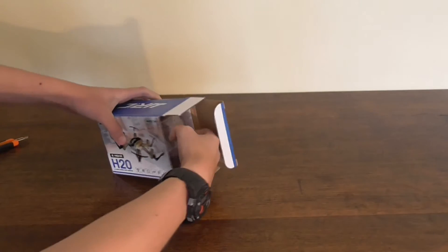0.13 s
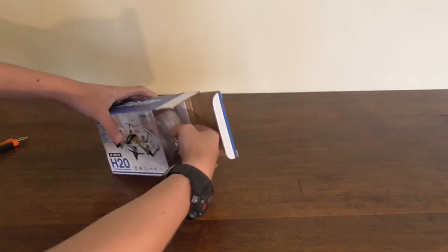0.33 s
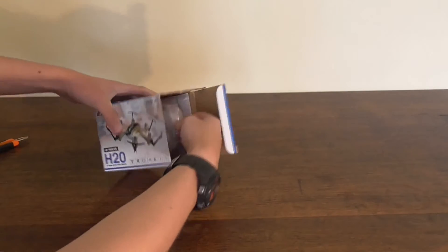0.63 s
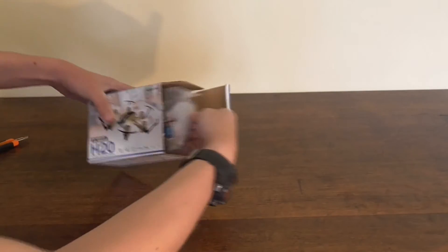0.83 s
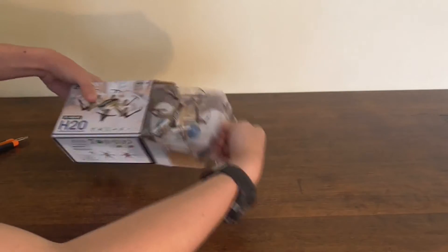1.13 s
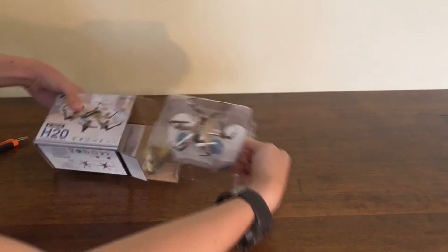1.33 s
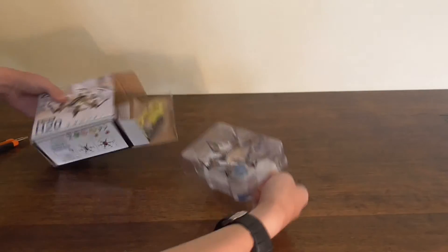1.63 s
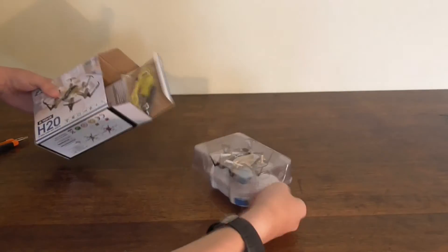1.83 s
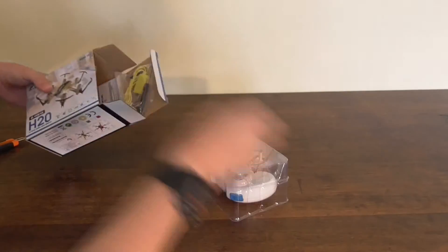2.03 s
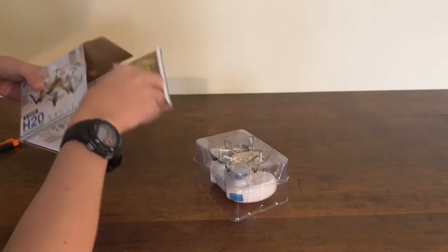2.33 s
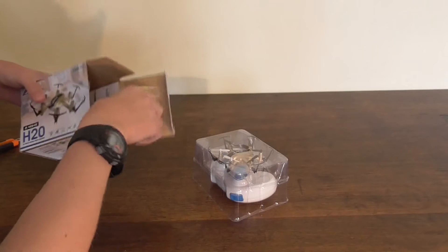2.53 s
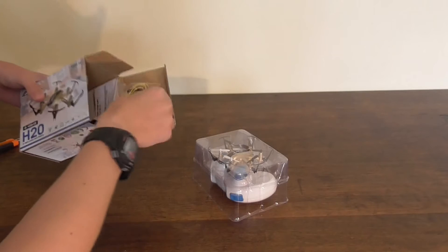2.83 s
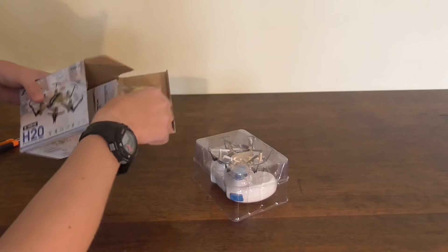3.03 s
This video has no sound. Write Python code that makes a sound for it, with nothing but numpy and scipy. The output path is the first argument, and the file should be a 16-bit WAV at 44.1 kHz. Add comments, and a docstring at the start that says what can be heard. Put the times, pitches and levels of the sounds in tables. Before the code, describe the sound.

A cardboard box being unpacked, with hollow knocks, sharp plastic snaps and rustling.

```python
"""Hollow cardboard knocks and sharp plastic snaps sound in a live room as a thin tray leaves its box.
Struck or buckling panels ring briefly, creases in the plastic flip over with a crack, and stick-slip
friction makes the card drum and the plastic crinkle. The tray lands on a wooden table with a few dull
thuds; then a hand rummages among the paper in the box. A faint steady noise lies underneath."""
import sys
import numpy as np
from scipy import signal
from scipy.fft import rfft, irfft
from scipy.io import wavfile

SR = 44100
rng = np.random.default_rng(int(sys.argv[2]) if len(sys.argv) > 2 else 0)


def wav_record(signal):
    """Record a signal, one row per channel, as 16-bit PCM in the file named by sys.argv[1]."""
    frames = np.transpose(np.atleast_2d(signal))
    bounded = np.clip(frames, -1, 1)
    # unit amplitude maps onto the largest positive 16-bit level
    quanta = np.round(bounded * 32767).astype(np.int16)
    wavfile.write(sys.argv[1], SR, quanta)


N = 141120
T = np.arange(N) / SR
FFT_SIZE = 5 * 2 ** 15
HZ = np.maximum(np.arange(FFT_SIZE // 2 + 1) * SR / FFT_SIZE, 1)


def from_db(db):
    """Amplitude ratio: tenfold for every 20 dB."""
    return 10 ** (np.asarray(db) / 20)


def unit_rms(x):
    """Normalisation to unit mean power."""
    return x / np.sqrt(np.mean(x ** 2) + 1e-20)


def at_hz(points, hz=HZ):
    """Interpolation of a table on a log-frequency axis."""
    frequencies, values = np.transpose(points)
    return np.interp(np.log(hz), np.log(frequencies), values)


def decay(t, t60):
    """Exponential damping: a fall of 60 dB in t60 seconds."""
    return np.exp(-np.log(1000) * t / max(t60, 1e-4))


def resonances(modes, width_hz):
    """Resonance: each mode adds a bell-shaped peak, in dB, to a body's response."""
    return sum(db / (1 + (2 * (HZ - hz) / width_hz) ** 2) for hz, db in modes)


def colour(x, db):
    """Causal, minimum-phase filtering, scaled so that white noise keeps its power."""
    gain = unit_rms(from_db(db))
    cepstrum = irfft(np.log(gain + 1e-9))[:FFT_SIZE // 2]
    cepstrum[0] /= 2
    response = np.exp(rfft(2 * cepstrum, FFT_SIZE))
    return irfft(rfft(x, FFT_SIZE) * response)[..., :x.shape[-1]]


def bands(length, low_hz, count=7):
    """Complementary log-spaced bands: pairs of centre in Hz and bin weights that sum to one."""
    centres = np.geomspace(low_hz, 15000, count)
    log_hz = np.log(np.arange(length // 2 + 1) * SR / length + 1)
    return [(hz, np.interp(log_hz, np.log(centres), share)) for hz, share in zip(centres, np.eye(count))]


def add(track, start, sound):
    """Superposition: a sound joins the track at its start in seconds."""
    i = max(int(start * SR), 0)
    track[i:i + len(sound)] += sound[:N - i]


def contact(t60, size=4096, whitening=0.92):
    """Broadband excitation: a dying flurry of tiny slips with a nearly flat spectrum."""
    fall = decay(T[:size], t60)
    spectrum = rfft(rng.standard_normal(size) * fall)
    flurry = irfft(spectrum / (np.abs(spectrum) + 1e-12) ** whitening) * np.sqrt(fall)
    return .5 * unit_rms(flurry) * np.sqrt(np.mean(fall ** 2))


def judder(per_s, depth_db):
    """Random amplitude modulation: a gain that wavers by depth_db rms."""
    knots = rng.standard_normal(4096)
    wavering = unit_rms(np.interp(T * per_s, np.arange(len(knots)), knots))
    return from_db(depth_db * wavering)


def clicks(per_s, spread_db):
    """Shot noise: independent impulses of uneven size and either sign."""
    sizes = from_db(spread_db * np.minimum(rng.exponential(1, N), 4.5))
    signs = rng.choice([-1, 1], N)
    return unit_rms(sizes * signs * (rng.random(N) < per_s / SR))


# Each row: start in seconds, ring level in dB, panel pitch in Hz, clatter level in dB.
BOX_KNOCKS = [(.008, -26.5, 170, -36), (0.113, -23.5, 416, -50), (.1498, -24, 500, -27),
              (0.2347, -21, 855, -16.5), (0.254, -37, 234, -48), (.2728, -20, 500, -13.5),
              (0.2774, -12.5, 547, -15.5), (0.2962, -20, 547, -16.5), (0.5965, -10, 565, -19),
              (0.7695, -16.5, 427, -18.5), (0.7858, -20.5, 502, -23), (0.8453, -13, 518, -26.5),
              (1.0985, -22.5, 317, -44), (1.129, -24, 1110, -14.5), (1.479, -26.5, 460, -29),
              (1.543, -16.5, 726, -17), (2.32, -34, 471, -40.5), (2.376, -24.5, 736, -30),
              (2.647, -29.5, 862, -27), (2.7686, -22.5, 423, -25), (3.171, -31, 394, -50)]
# The clatter's spectrum. Each row: frequency in Hz, relative gain in dB.
BOX_SPECTRUM = [(50, -27.5), (180, -19.5), (600, 4), (1250, 1), (1900, -11), (4000, -17.5), (8000, -30),
                (16000, -42)]
# Resonances of the box and the air in it. Each row: frequency in Hz, boost in dB.
BOX_MODES = [(179, 3), (306, 4.5), (368, 7.5), (442, 2.5), (580, 4.5), (690, 7)]
BOX_MODE_WIDTH_HZ = 17


def box_knocks(ring_t60_s=0.041, attack_s=0.0015, clatter_t60_s=0.04, low_cut_hz=173):
    """Damped free vibration: a knocked or buckling panel rings while the rest of the box clatters."""
    panels, clatter = np.zeros(N), np.zeros(N)
    t = T[:SR // 4]
    envelope = decay(t, ring_t60_s) * (1 - np.exp(-t / attack_s))
    for start, ring_db, hz, clatter_db in BOX_KNOCKS:
        add(panels, start, from_db(ring_db) * np.sin(2 * np.pi * hz * t) * envelope)
        add(clatter, start, from_db(clatter_db) * contact(clatter_t60_s))
    panels = signal.sosfilt(signal.butter(2, low_cut_hz, "high", fs=SR, output="sos"), panels)
    return panels + colour(clatter, at_hz(BOX_SPECTRUM) + resonances(BOX_MODES, BOX_MODE_WIDTH_HZ))


# Each row: start in seconds, level in dB, 60 dB decay time in seconds.
PLASTIC_SNAPS = [(0.0428, -21, 0.0056), (0.066, -36.5, 0.017), (0.1502, -33, 0.01), (0.2073, -29, 0.013),
                 (0.235, -18, 0.017), (0.296, -30, 0.012), (.315, -25.5, 0.024), (0.4954, -7, 0.011),
                 (1.128, -16, 0.099), (1.135, -18.5, 0.02), (1.16, -17, 0.025), (1.3788, -28, 0.022),
                 (1.4872, -29.5, 0.018), (1.5449, -5.5, 0.0078), (2.376, -31.5, 0.013), (2.551, -31, 0.046),
                 (2.58, -29, 0.0073), (2.648, -31, 0.032), (2.7065, -25, 0.012), (2.802, -25, 0.0092),
                 (3.1951, -35, 0.02)]
# The snaps' spectrum. Each row: frequency in Hz, relative gain in dB.
PLASTIC_SPECTRUM = [(70, -24), (200, -20.5), (750, 2.5), (2900, -1.5), (4500, 2.5), (7000, -1.5),
                    (12000, -2.5), (16500, -24)]
# Resonances of the tray. Each row: frequency in Hz, boost in dB.
TRAY_MODES = [(1134, 4), (2140, 9.5), (2700, -0.5), (4230, 5)]
TRAY_MODE_WIDTH_HZ = 79


def plastic_snaps():
    """Snap-through buckling: a crease flips over and its brief crack excites the tray's modes."""
    cracks = np.zeros(N)
    for start, db, t60 in PLASTIC_SNAPS:
        add(cracks, start, from_db(db) * contact(t60))
    return colour(cracks, at_hz(PLASTIC_SPECTRUM) + resonances(TRAY_MODES, TRAY_MODE_WIDTH_HZ))


# Card, plastic and paper slide on each other.
# Each row: start in seconds, length in seconds, drumming level in dB, crinkle level in dB.
SLIDE_STROKES = [(0, 0.19, -41, -55.5), (0.217, .1, -36, -60), (0.386, 0.023, -34.5, -41.5),
                 (0.433, 0.076, -34, -40.5), (0.589, .06, -35, -39.5), (0.703, 0.059, -42.5, -43),
                 (0.82, 0.15, -35, -39.5), (0.938, 0.2, -46.5, -52.5), (1.085, 0.14, -35, -39.5),
                 (1.198, 0.21, -39.5, -46), (1.36, 0.19, -47.5, -53.5), (1.823, 0.19, -37, -51.5),
                 (2.31, 0.061, -52.5, -56), (2.36, 0.08, -41.5, -51.5), (2.498, 0.099, -43, -42.5),
                 (2.578, 0.083, -45, -46.5), (2.668, 0.21, -50, -51), (2.794, 0.058, -43, -42),
                 (2.907, 0.15, -48.5, -54), (3.079, 0.13, -49.5, -52.5)]
# Spectra of the drumming and the crinkle. Each row: frequency in Hz, relative gain in dB.
DRUMMING_SPECTRUM = [(50, -40), (170, -5.5), (550, 2.5), (1300, -5), (2200, -21.5), (16000, -40.5)]
CRINKLE_SPECTRUM = [(300, -30), (1200, -9), (3000, 2.5), (4500, 4), (7000, 0.5), (12500, 4), (16000, -22)]


def sliding_edges(swell_power=0.7):
    """Stick-slip friction: coarse catches drum on the card, fine ones crinkle in separate bands."""
    drumming_swell, crinkle_swell = np.zeros(N), np.zeros(N)
    for start, length, drumming_db, crinkle_db in SLIDE_STROKES:
        speed = np.abs(np.sin(np.pi * T[:int(length * SR)] / length))
        strength = speed ** swell_power
        add(drumming_swell, start, from_db(drumming_db) * strength)
        add(crinkle_swell, start, from_db(crinkle_db) * strength)
    coarse = clicks(per_s=900, spread_db=0.5)
    drumming = drumming_swell * unit_rms(coarse * judder(per_s=83, depth_db=1.5))
    fine = irfft(sum(band * rfft(clicks(per_s=2500, spread_db=4)) for _, band in bands(N, low_hz=1197)))
    crinkle = crinkle_swell * unit_rms(fine * judder(per_s=110, depth_db=3))
    box_db = at_hz(DRUMMING_SPECTRUM) + resonances(BOX_MODES, BOX_MODE_WIDTH_HZ)
    tray_db = at_hz(CRINKLE_SPECTRUM) + resonances(TRAY_MODES, TRAY_MODE_WIDTH_HZ)
    return colour(drumming, box_db) + colour(crinkle, tray_db)


# Each row: start in seconds, level in dB, 60 dB decay time of the rattle in seconds.
TRAY_LANDINGS = [(1.7106, -28, 0.21), (1.721, -30.5, 0.14), (1.8353, -24, 0.14), (1.9008, -23.5, 0.08),
                 (1.91, -19, 0.06)]
# The thuds on the wooden table. Each row: frequency in Hz, relative gain in dB.
THUD_SPECTRUM = [(40, -32), (170, -5), (450, 0.5), (1450, -7), (2300, -23), (9000, -28), (16000, -38)]


def tray_landings():
    """Impact excitation: the tray meets the table edge by edge and its contents rattle dully."""
    impacts = np.zeros(N)
    for start, db, t60 in TRAY_LANDINGS:
        add(impacts, start, from_db(db) * contact(t60))
    return colour(impacts, at_hz(THUD_SPECTRUM))


# Each row: frequency in Hz, reverberation time in seconds.
ROOM_T60 = [(150, 0.48), (400, 0.35), (3000, 0.53), (15000, 0.53)]
# Each row: frequency in Hz, tail against direct sound in dB before wet_db is added.
TAIL_LEVEL = [(60, 1), (300, -2.5), (2000, -3.5), (14000, -14)]
# Each row: frequency in Hz, the tail's side against its mid in dB.
TAIL_WIDTH = [(300, -10), (12000, 1)]
# Each row: frequency in Hz, left minus right in dB.
STEREO_BALANCE = [(600, -0.7), (6000, -0.4), (13000, -5)]


def room(x, wet_db, delay_s=0.00088, build_s=0.0031):
    """Reverberation: a diffuse stereo tail follows the direct sound and dies away band by band."""
    t = T[:SR // 2]
    noise, tail = rfft(rng.standard_normal((2, len(t)))), 0
    onset = np.clip((t - delay_s) / build_s, 0, 1)
    for hz, band in bands(len(t), low_hz=67):
        fall = onset * decay(t, at_hz(ROOM_T60, hz))
        tail = tail + irfft(noise * band) * fall / np.sqrt(np.sum(fall ** 2))
    mid, side = rfft(tail, FFT_SIZE) * from_db(at_hz(TAIL_LEVEL) + wet_db)
    ears = np.array([[1], [-1]])
    response = 1 + mid + ears * side * from_db(at_hz(TAIL_WIDTH))
    balance = from_db(ears * at_hz(STEREO_BALANCE) / 2)
    return irfft(rfft(x, FFT_SIZE) * response * balance)[:, :N]


# The room's steady noise. Each row: frequency in Hz, relative gain in dB.
AMBIENT_SPECTRUM = [(25, -34), (150, 5), (1200, -3), (5000, -21), (11000, -10.5), (16000, -22)]


def ambient_noise(mid_db=-65.5, side_over_mid_db=1):
    """Stationary noise: a faint floor, nearly uncorrelated between left and right."""
    mid, side = colour(rng.standard_normal((2, N)), at_hz(AMBIENT_SPECTRUM))
    return from_db(mid_db) * (mid + from_db(side_over_mid_db) * side * [[1], [-1]])


def scene():
    """Superposition: three groups of sounds, each with its own room tail, add to the noise floor."""
    knocks = room(box_knocks(), wet_db=-0.5)
    snaps = room(plastic_snaps(), wet_db=1)
    slides_and_thuds = room(sliding_edges() + tray_landings(), wet_db=0)
    return knocks + snaps + slides_and_thuds + ambient_noise()


def record(dry, cutoff_hz=16300):
    """Band limiting: a steep elliptic low-pass removes the highest treble."""
    return signal.sosfilt(signal.ellip(10, .2, 80, cutoff_hz, fs=SR, output="sos"), dry)


dry = scene()
out = record(dry)
wav_record(out)
```